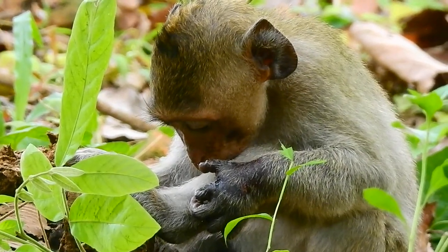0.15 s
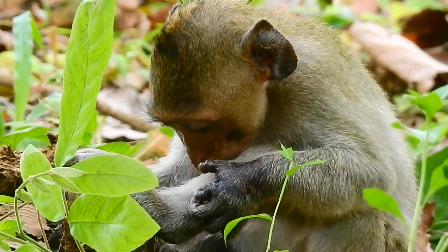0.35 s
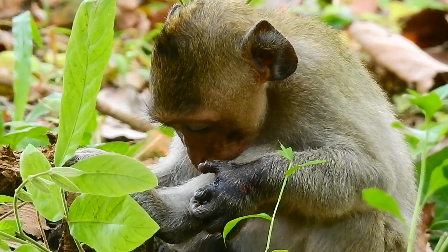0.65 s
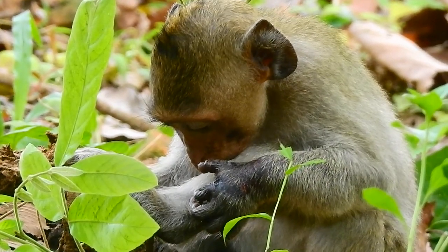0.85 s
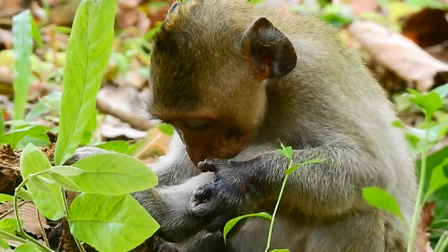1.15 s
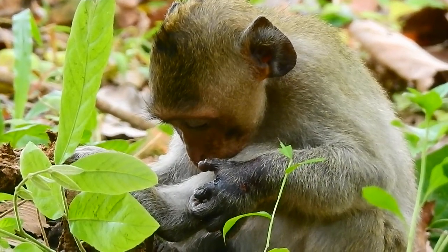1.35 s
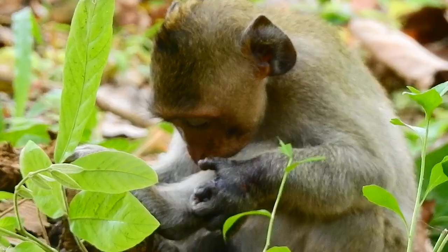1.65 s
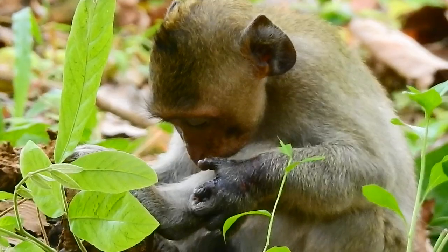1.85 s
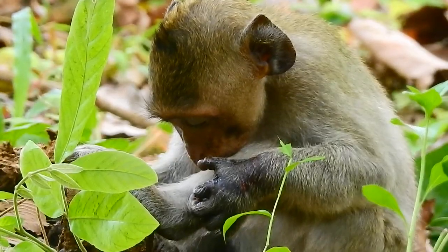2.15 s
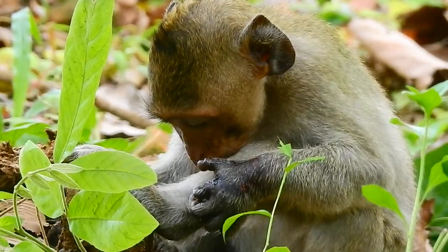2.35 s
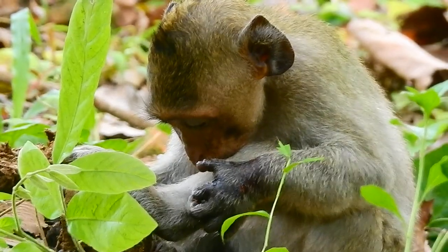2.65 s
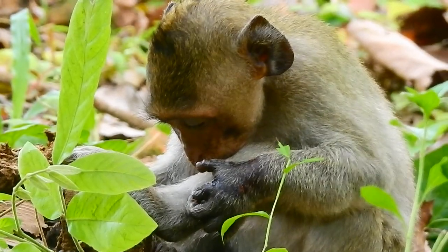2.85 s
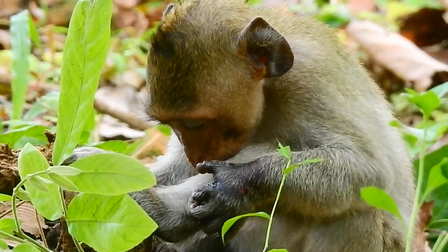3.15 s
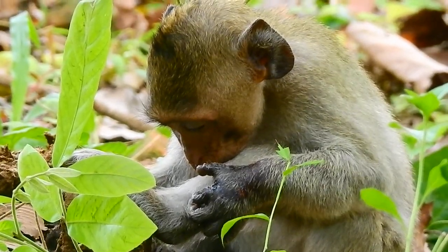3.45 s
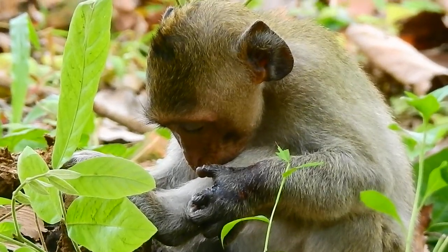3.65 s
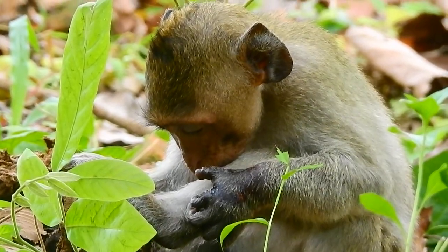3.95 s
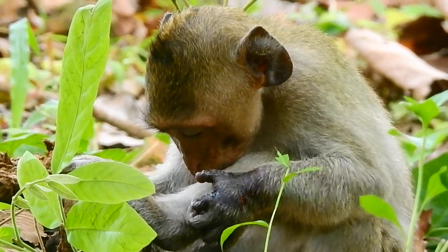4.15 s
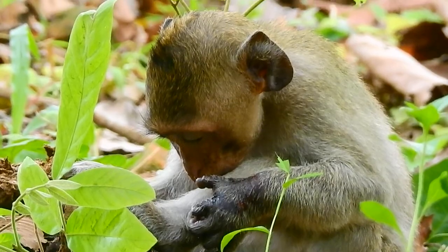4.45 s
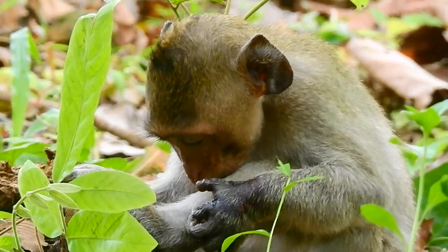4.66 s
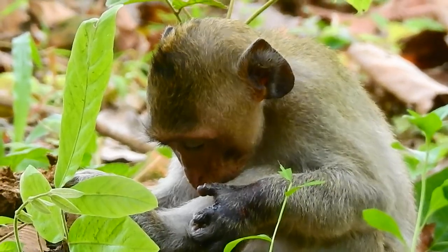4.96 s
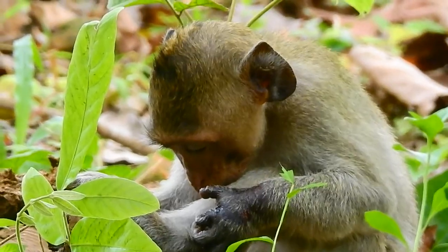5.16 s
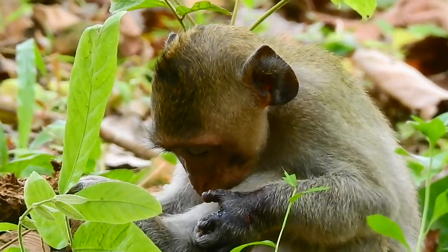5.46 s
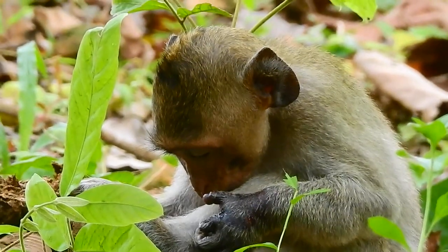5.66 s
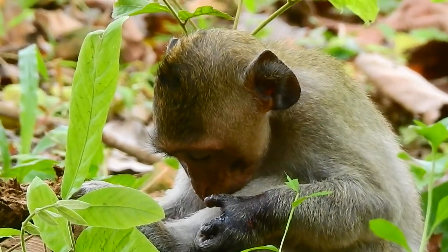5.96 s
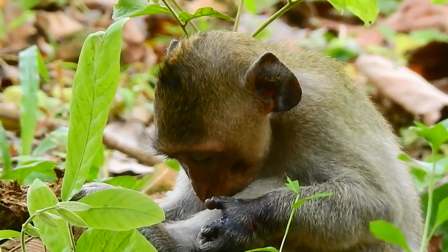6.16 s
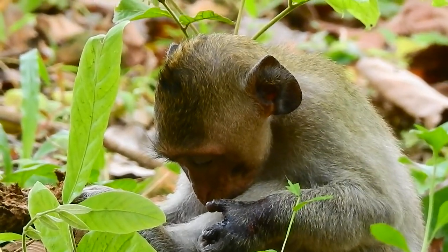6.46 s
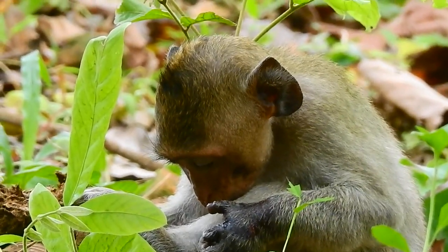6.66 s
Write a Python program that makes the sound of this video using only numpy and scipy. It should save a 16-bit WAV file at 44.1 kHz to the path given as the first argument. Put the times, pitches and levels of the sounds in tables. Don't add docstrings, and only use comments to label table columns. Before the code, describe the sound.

Insects sizzle steadily from the start, swelling slightly and easing later. Over them come quick nasal animal peeps, some scooping up, some drooping, plus pinpoint whistled notes and hoarse rasps. Far animals chatter among trees, gradually calmer. A finger bumps the covered left microphone once early. Low rumble and a distant motor hum lie underneath. The open right side is bright, the left boxy and dull; the monkey's quiet feeding is not heard.

```python
import sys
import numpy as np
from scipy import signal
from scipy.io import wavfile
from scipy.ndimage import uniform_filter1d

SR = 44100
rng = np.random.default_rng(int(sys.argv[2]) if len(sys.argv) > 2 else 0)


def to_linear_factor(level_db):
    exponent = np.asarray(level_db, float) / 20
    return 10 ** exponent


def unload_audio(sound):
    columns = np.transpose(np.atleast_2d(sound))
    steps = np.round(np.clip(columns, -1, 1) * 32767)
    wavfile.write(sys.argv[1], SR, steps.astype(np.int16))


N = 300011
FRAME = 2048
HOP = FRAME // 4
BIN_HZ = np.fft.rfftfreq(FRAME, 1 / SR)[:, None]

# frequency [Hz], level [dB].
HISS_SPECTRUM = [(2600, -67.5), (3100, -68), (3500, -64), (3900, -67.5), (4250, -59), (4700, -53.5),
                 (5000, -52), (5300, -57), (5700, -61.5), (6500, -69.5), (8000, -81), (10000, -94),
                 (12500, -108), (15500, -120)]
# time [s], level [dB].
CHORUS_SWELL = [(0.0, -37), (0.47, -36), (0.62, -36.5), (0.87, -36), (1.06, -36), (1.46, -37), (2.27, -37),
                (2.99, -39), (3.64, -37.5), (4.01, -39.5), (4.18, -37.5), (4.62, -39), (5.34, -38.5),
                (5.93, -40), (6.44, -37), (6.7, -39), (6.8, -38)]
# start [s], length [s], level over the hiss [dB].
RASPS = [
    (.46, 0.2, -8),
    (.86, .15, -10),
    (1.124, 0.21, 0.5),
    (1.43, 0.15, -2.5),
    (2.14, 0.17, -8),
    (3.46, 0.11, -3.5),
    (3.735, 0.074, 0),
    (5.186, 0.17, -4),
    (6.2, 0.17, -10),
    (6.697, 0.079, -5),
]
# frequency [Hz], level [dB].
RASP_TILT = [(2000, 1), (3200, 4), (5000, -3), (7000, -1), (9500, 0), (12000, -6)]
# start [s], length [s], pitch [Hz], level [dB], low multiples [dB].
DROOPS = [
    (.995, .07, 826, -48, 10),
    (3.29, .055, 735, -39, -1),
    (4.81, .2, 866, -33, -3),
    (5.415, .2, 866, -33.5, -2.5),
    (6.11, .23, 868, -38, -1),
]
# start [s], length [s], pitch [Hz], level [dB],
# low multiples [dB].
SCOOPS = [
    (.865, .13, 824, -29, 0.5),
    (1.99, .14, 918, -36, 2.5),
    (3.18, .068, 830, -26, -2),
]
# start [s], length [s], pitch [Hz], level [dB], low multiples [dB].
HELD = [
    (.385, 0.19, 897, -31, 1),
    (1.07, 0.24, 891, -38.5, 13.5),
    (3.55, 0.18, 884, -36.5, 5.5),
    (4.205, .155, 880, -34, 5.5),
    (6.745, .055, 885, -48, 18),
]
# start [s], length [s], pitch [Hz], level [dB], low multiples [dB].
THIN = [
    (2.49, .13, 810, -44, 0),
]
DROOP_SHAPE = (0, .09, .5)
SCOOP_SHAPE = (.12, .035, .4)
HELD_SHAPE = (-0.0098, 0.013, 0.32)
# multiple of the pitch [1], level [dB], change from start to end [dB].
DROOP_VOICE = [(2, -9, -12), (3, -11, 4), (4, -0.5, 3), (6, 1.5, -12), (8, -22, 40), (10, -30, 6)]
SCOOP_VOICE = [(3, -19, -14), (4, -8, 4), (5, -24, -22), (6, 0.5, -4), (7, -15, -3), (8, -23, 4)]
HELD_VOICE = [(2, -21, -8), (3, -17.5, 4), (4, -14, 3), (6, 0, -7), (7, -15, 9), (8, -21, 2), (9, -29, 5),
              (10, -29.5, 8)]
THIN_VOICE = [(3, -3, -1), (8, 3, -5)]
CRY_VOICE = [(2, -12, -8), (3, -8, -3), (4, -7, -1.5), (6, 3, -5), (8, -14, 2), (10, -27, -2)]
# time [s], pitch [Hz], level [dB].
CRY = [
    (6.535, 720, -45),
    (6.56, 800, -41),
    (6.582, 888, -31.5),
    (6.615, 868, -36),
    (6.68, 865, -32.5),
    (6.715, 842, -35.5),
    (6.755, 790, -41),
]
# start [s], length [s], start pitch [Hz],
# end pitch [Hz], level [dB].
NOTES = [(.548, .035, 4090, 4130, -30.5), (1.563, .055, 6400, 6330, -47), (1.97, .05, 6350, 6600, -47),
         (2.146, .051, 5330, 5280, -34), (2.35, .035, 2820, 2740, -43), (2.3, .047, 4900, 4750, -31),
         (2.25, .19, 3590, 3600, -50), (2.656, .03, 2070, 2040, -44), (2.8, .042, 4030, 4090, -42),
         (2.997, .032, 4700, 4640, -31), (3.25, .12, 3240, 3230, -48), (3.428, .14, 2560, 2390, -43),
         (3.44, .035, 2660, 2700, -40), (3.695, .11, 2440, 2360, -46), (3.97, .049, 2350, 2390, -47),
         (4.125, .049, 3220, 3110, -39), (5.015, .034, 2760, 2800, -40.5), (1.46, .055, 4180, 4180, -39),
         (5.23, .051, 4560, 4540, -38), (4.142, .04, 4720, 4600, -34), (4.23, .035, 2930, 2880, -44),
         (1.2, .065, 3680, 3720, -38), (.24, .16, 4170, 4165, -44), (1.46, .06, 3710, 3710, -39)]
# start [s], frequency [Hz], level [dB].
BUZZES = [
    (.74, 9560, -67),
    (1.33, 9350, -64),
    (2.28, 9650, -70),
    (4.78, 9600, -66),
    (6.0, 9340, -62),
]
# time [s], pitch [Hz], effort [dB].
WHINE_PHRASES = [
    [(0.0, 467, -39), (.06, 465, -43), (.2, 462, -47), (.25, 462, -33), (.295, 462, -42), (.36, 462, -38),
     (.45, 460, -47), (.58, 455, -43), (.63, 455, -50)],
    [(1.12, 458, -50), (1.165, 463, -33), (1.24, 462, -39), (1.32, 463, -41), (1.44, 463, -44),
     (1.495, 465, -36), (1.54, 464, -44), (1.61, 460, -42), (1.75, 461, -50)],
]
# multiple of the pitch [1], level [dB], share of the effort followed [0-1].
WHINE_VOICE = [(6, -39.5, 1.0), (8, -43.5, .4), (9, -40.5, .3)]
# multiple of the pitch [1], level [dB].
FLOCK_VOICE = [(2, -8), (3, 1.5), (4, 3), (6, 10), (7, -7), (8, -20)]
# start [s], level [dB], frequency [Hz], decay by 20 dB [s].
KNOCKS = [
    (1.808, -29, 760, 0.014),
    (1.826, -34, 604, 0.018),
    (1.828, -39, 1800, .03),
]
# time [s], level [dB].
HUM_LEVEL = [(0.0, -46), (.55, -46), (1.2, -55.5), (3.3, -62), (4.15, -45.5), (4.55, -44), (4.75, -54),
             (5.4, -50.5), (5.55, -45), (6.4, -45.5), (6.55, -52), (6.75, -45)]
# frequency [Hz], level [dB].
RUMBLE_SPECTRUM = [(25, -88), (45, -76), (65, -73), (85, -77), (115, -52.5), (155, -49), (250, -57),
                   (420, -60.5), (680, -57), (950, -59.5), (1050, -57.5), (1850, -60), (2050, -68.5),
                   (2600, -69)]
# frequency [Hz], level [dB].
COVERED_SPECTRUM = [(25, -86), (45, -79), (65, -61.5), (85, -66.5), (115, -58.5), (155, -47), (250, -62),
                    (300, -58.5), (400, -63.5), (500, -74.5), (1000, -76.5), (1850, -87), (2050, -116),
                    (4000, -105)]
# frequency [Hz], width [Hz], level [dB].
BOX_RESONANCES = [(365, 70, -1.5), (646, 74, 9.5), (780, 106, 9), (1053, 27, 16.5), (1260, 35, 14),
                  (1405, 120, 11.5), (1800, 77, 14)]
# frequency [Hz], shared part [0-1].
PORT_LIKENESS = [(25, .4), (50, .72), (110, 1), (180, 0.87), (300, 0.71), (370, 0.13), (530, 0.25),
                 (650, 0.2), (3000, 0.45), (4000, .05)]
# frequency [Hz], level [dB].
SELF_NOISE_SPECTRUM = [(1500, -86), (3900, -86), (4200, -85.5), (6000, -87.5), (8000, -89.5), (10000, -95),
                       (12500, -99.5), (15500, -104)]


def evened(x):
    return x / np.sqrt(np.mean(x ** 2) + 1e-20)


def at_bins(points):
    f_hz, value = np.transpose(points)
    return np.interp(np.log(BIN_HZ + 1), np.log(f_hz + 1), value)


def curve(rows):
    s, *columns = np.transpose(rows)
    t = np.arange(s[0], s[-1], 1 / SR)
    return s[0], [np.interp(t, s, column) for column in columns]


def add(mix, start_s, event):
    part = mix[round(start_s * SR):][:len(event)]
    part += event[:len(part)]


def spectra(x):
    return signal.stft(x, nperseg=FRAME, noverlap=FRAME - HOP)[2] * np.sqrt(4096 / 1.5)


def waveform(z):
    return signal.istft(z, nperseg=FRAME, noverlap=FRAME - HOP)[1][:N]


def wander(count, rate_hz):
    span = max(int(SR / rate_hz), 2)
    smooth = uniform_filter1d(uniform_filter1d(rng.standard_normal(count), span), span)
    return smooth * np.sqrt(1.5 * span)


def patches(patchy_db):
    field = rng.standard_normal((FRAME // 2 + 1, N // HOP + 2))
    field = uniform_filter1d(field, size=16, axis=0)
    return patchy_db * evened(uniform_filter1d(field, size=6, axis=1))


def bustle(count):
    t = np.arange(count) * HOP / SR
    swell_db = np.interp(t, *np.transpose(CHORUS_SWELL)) + 38
    level_db = 2.5 + 0.16 * swell_db - 0.46 * t
    return to_linear_factor(level_db * ((BIN_HZ > 1900) & (BIN_HZ < 4100)))


def tone(pitch_hz, fuzz_hz, shimmer_db):
    count = len(pitch_hz)
    unsteady_hz = pitch_hz + fuzz_hz * wander(count, 500)
    phase = 2 * np.pi * (np.cumsum(unsteady_hz) / SR + rng.random())
    return phase, np.sqrt(2) * to_linear_factor(shimmer_db * wander(count, 50))


def voice(pitch_hz, level_db, orders, low_db, flutter_db):
    phase, flutter = tone(pitch_hz, fuzz_hz=4, shimmer_db=.8)
    count = len(phase)
    along = np.linspace(-.5, .5, count)
    stack = np.zeros(count)
    for k, db, shift_db in orders:
        partial_db = db + shift_db * along + low_db * (k < 5) + flutter_db * wander(count, 60)
        stack += to_linear_factor(partial_db) * np.sin(k * phase)
    return stack * flutter * to_linear_factor(level_db) * signal.windows.tukey(count, .12)


def rasps():
    effort = np.zeros(N)
    for s, length_s, db in RASPS:
        add(effort, s, to_linear_factor(db) * signal.windows.tukey(int(length_s * SR), .7))
    z = spectra(effort * rng.standard_normal(N) * to_linear_factor(1.2 * wander(N, 150)))
    return z * to_linear_factor(at_bins(RASP_TILT) + patches(patchy_db=4.5)[:, :z.shape[1]])


def insects():
    clicks = rng.standard_normal(N) * to_linear_factor(0.57 * wander(N, 220) + 0.29 * wander(N, 35))
    swell = to_linear_factor(np.interp(np.arange(N) / SR, *np.transpose(CHORUS_SWELL)) + 38)
    z = spectra(evened(clicks) * swell)
    z *= to_linear_factor(patches(patchy_db=1.44)[:, :z.shape[1]]) * bustle(z.shape[1])
    above_rumble = BIN_HZ >= RUMBLE_SPECTRUM[-1][0]
    return waveform((z + rasps()) * to_linear_factor(at_bins(HISS_SPECTRUM)) * above_rumble)


def peeps():
    out = np.zeros(N)
    kinds = [(DROOPS, DROOP_SHAPE, DROOP_VOICE), (SCOOPS, SCOOP_SHAPE, SCOOP_VOICE),
             (HELD, HELD_SHAPE, HELD_VOICE), (THIN, DROOP_SHAPE, THIN_VOICE)]
    scoop_s, droop_power, crest_db = .021, 3.2, -11
    for rows, (scoop, droop, crest), orders in kinds:
        for s, length_s, top_hz, db, low_db in rows:
            t = np.arange(0, length_s, 1 / SR)
            bend = scoop * np.exp(-t / scoop_s) + droop * (t / length_s) ** droop_power
            arch = np.interp(t / length_s, [0, crest, 1], [1, 0, 1])
            level_db = db + crest_db * arch ** 2
            add(out, s, voice(top_hz * (1 - bend), level_db, orders, low_db, flutter_db=1.2))
    return out


def cry():
    out = np.zeros(N)
    s, (pitch_hz, level_db) = curve(CRY)
    add(out, s, voice(pitch_hz, level_db + 1.0, CRY_VOICE, 0, flutter_db=2.2))
    return out


def notes_and_buzzes():
    out = np.zeros(N)
    whistles = [(*row, 30) for row in NOTES]
    buzzes = [(s, 0.11, f_hz, f_hz, db, 130) for s, f_hz, db in BUZZES]
    for s, length_s, start_hz, end_hz, db, fuzz_hz in whistles + buzzes:
        count = int(length_s * SR)
        phase, flutter = tone(np.linspace(start_hz, end_hz, count), fuzz_hz, shimmer_db=1.2)
        add(out, s, to_linear_factor(db) * flutter * np.sin(phase) * signal.windows.tukey(count, .6))
    return out


def whine():
    out = np.zeros(N)
    for rows in WHINE_PHRASES:
        s, (pitch_hz, effort_db) = curve(rows)
        weakness = np.clip((-33 - effort_db) / 8, 0, 1)
        for k, db, share in WHINE_VOICE:
            phase, flutter = tone(k * pitch_hz, fuzz_hz=30, shimmer_db=1.5)
            sputter = np.clip(.85 + .4 * weakness * wander(len(phase), 70), .1, 1.2)
            level = to_linear_factor(db + share * (effort_db + 41)) * signal.windows.tukey(len(phase), .08)
            add(out, s, level * flutter * sputter * np.sin(phase))
    return out


def trees(x):
    t = np.arange(SR // 2) / SR
    tail = rng.standard_normal(len(t)) * to_linear_factor(-60 * t / .35) * (t > .008)
    return signal.oaconvolve(x, tail / np.linalg.norm(tail))[:N]


def flock(count=110):
    out = np.zeros(N)
    for when, high, long, size in rng.random((count, 4)):
        arch = np.linspace(-.7, 1, int((0.041 + 0.14 * long) * SR))
        pitch_hz = (800 + 110 * high) * (1 - 0.028 * arch ** 4)
        phase, flutter = tone(pitch_hz, fuzz_hz=5.5, shimmer_db=4.0)
        stack = np.zeros(len(arch))
        for k, db in FLOCK_VOICE:
            stack += to_linear_factor(db + 3 * wander(len(arch), 20)) * np.sin(k * phase)
        add(out, when * N / SR, to_linear_factor(-63 + 4 * size) * flutter * stack * np.hanning(len(arch)))
    return out + to_linear_factor(-1.5) * trees(out)


def knocks():
    out, t = np.zeros(N), np.arange(SR // 20) / SR
    for s, db, f_hz, t20_s in KNOCKS:
        ring = to_linear_factor(db - 60 * t / t20_s / 3) * np.sin(2 * np.pi * f_hz * t)
        add(out, s, ring * (1 + 0.98 * wander(len(t), 900)))
    return out


def hum():
    phase = 2 * np.pi * np.cumsum(302 + 3.5 * wander(N, 6)) / SR
    level_db = np.interp(np.arange(N) / SR, *np.transpose(HUM_LEVEL)) + 0.62 * wander(N, 12)
    return to_linear_factor(level_db) * np.array([to_linear_factor(-2.0) * np.sin(phase - 1.2), np.sin(phase)])


def rumble():
    near, other = spectra(rng.standard_normal((2, N)))
    frames = near.shape[1]
    same = np.clip(at_bins(PORT_LIKENESS), 0, 1)
    box_db = sum(db * np.exp(-((BIN_HZ - f_hz) / width_hz) ** 2) for f_hz, width_hz, db in BOX_RESONANCES)
    left = same * near * np.exp(-1.2j) + np.sqrt(1 - same ** 2) * other
    left = left * to_linear_factor(at_bins(COVERED_SPECTRUM) + box_db)
    right = near * to_linear_factor(at_bins(RUMBLE_SPECTRUM) + patches(patchy_db=0.97)[:, :frames])
    right = right * (BIN_HZ < RUMBLE_SPECTRUM[-1][0]) * bustle(frames)
    return np.array([waveform(left), waveform(right)])


def self_noise():
    noise = spectra(rng.standard_normal((3, N)))
    left, right, both = noise * to_linear_factor(at_bins(SELF_NOISE_SPECTRUM)) * (BIN_HZ > 1500)
    return np.array([waveform(0.82 * left + 0.26 * both), waveform(1.19 * right + 0.37 * both)])


def scene():
    calls = peeps() + cry() + notes_and_buzzes() + whine()
    calls = calls + to_linear_factor(-12) * trees(calls)
    cover = signal.butter(6, 3400, fs=SR, output="sos")
    covered = to_linear_factor(-33) * signal.sosfilt(cover, calls) + knocks()
    treble = calls + insects() + flock()
    return rumble() + self_noise() + hum() + np.array([covered, treble])


def low_pass(x):
    return signal.sosfilt(signal.butter(12, 15720, fs=SR, output="sos"), x)


def record(dry):
    edge = signal.firwin(511, 15800, window=("kaiser", 9), fs=SR)
    mix = signal.oaconvolve(dry, edge[None], "same") - .0004
    return low_pass(mix)


dry = scene()
out = record(dry)
unload_audio(out)
```